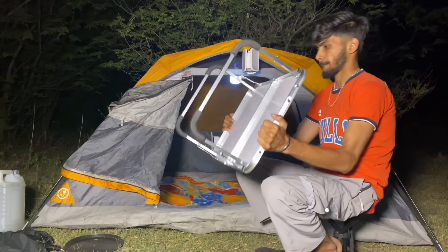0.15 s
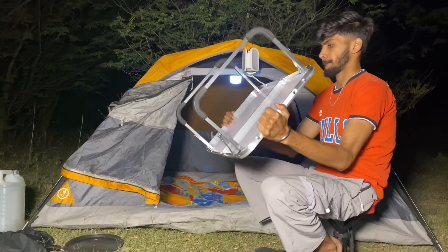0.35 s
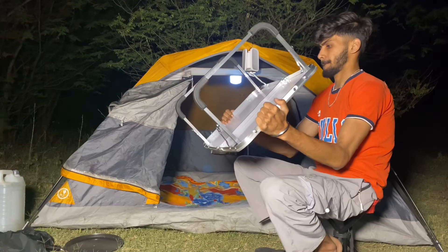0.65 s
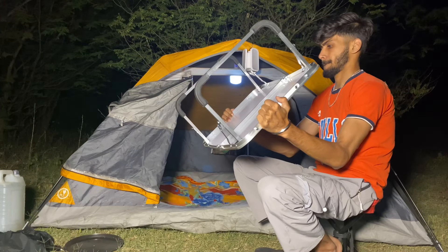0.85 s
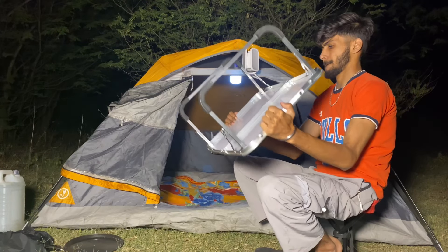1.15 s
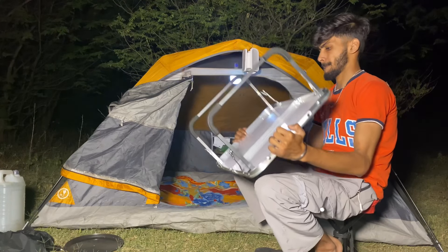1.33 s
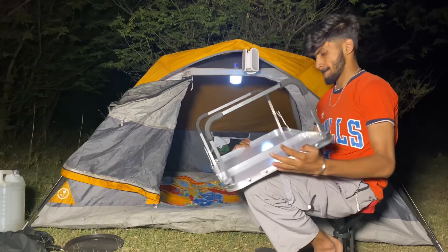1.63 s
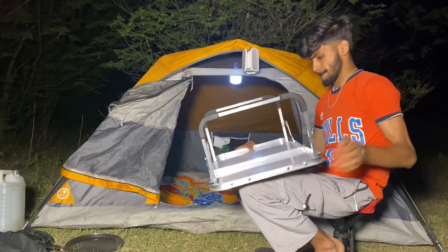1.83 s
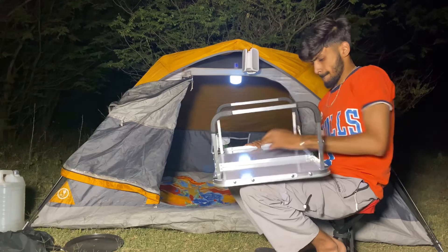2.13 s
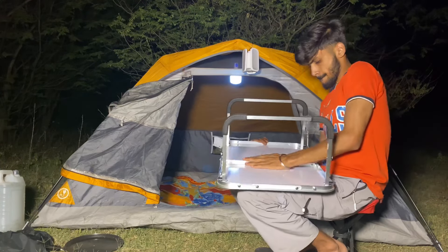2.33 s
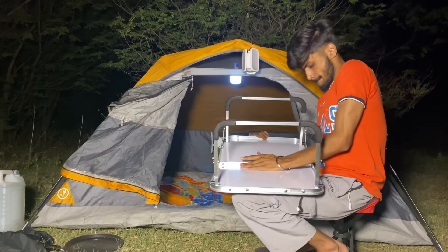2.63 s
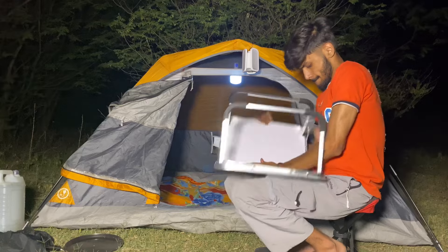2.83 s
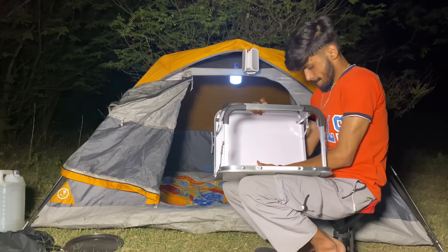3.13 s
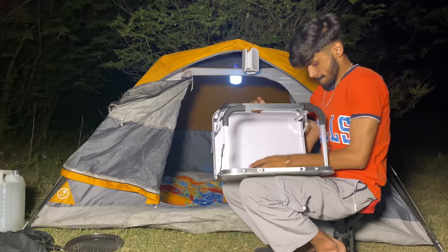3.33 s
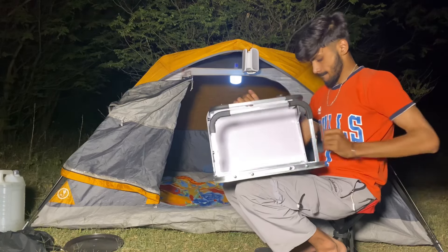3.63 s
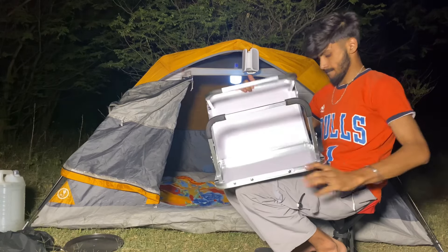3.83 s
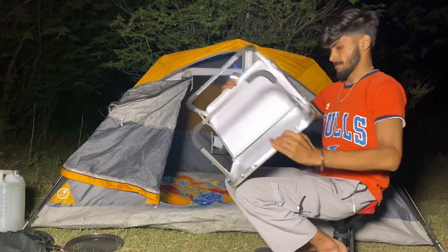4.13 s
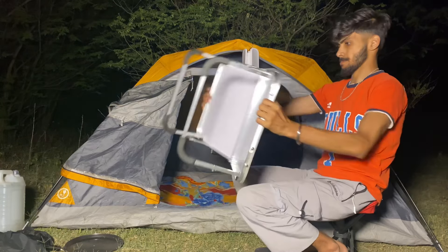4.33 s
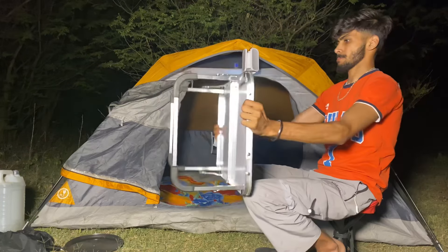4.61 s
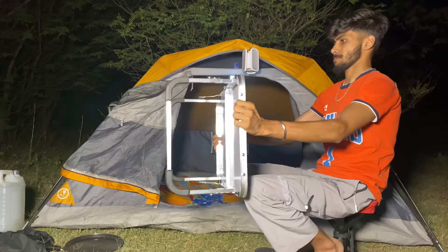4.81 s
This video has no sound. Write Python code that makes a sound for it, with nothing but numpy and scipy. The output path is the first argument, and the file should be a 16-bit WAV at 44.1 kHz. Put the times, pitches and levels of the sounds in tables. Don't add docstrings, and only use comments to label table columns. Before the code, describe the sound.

Close to a stereo microphone outdoors at night, a light folding aluminium table is turned and opened. Faint taps come first, then one loud brace snap with a quick bounce, a soft lap thump with palm rubbing, a quieter spell of faint dragging, and a second sharp snap that rattles into small clicks. Crickets trill steadily throughout over a far low rumble and soft hiss.

```python
import sys
import numpy as np
from scipy import signal
from scipy.fft import rfft, irfft, next_fast_len
from scipy.io import wavfile
from scipy.ndimage import uniform_filter1d, map_coordinates

SR = 44100
rng = np.random.default_rng(int(sys.argv[2]) if len(sys.argv) > 2 else 0)


def master(y):
    cut = np.clip(np.atleast_2d(y).T, -1, 1)
    pcm = np.round(cut * 32767)
    wavfile.write(sys.argv[1], SR, pcm.astype(np.int16))


def linear_from_db(decibels):
    return 10 ** (np.asarray(decibels, float) / 20)


N = 219085

# (start [s], end [s])
ON_LAP = (2.0, 3.37)


def evened(x):
    return x / np.sqrt(np.mean(x ** 2) + 1e-20)


def read(points, hz):
    f, value = np.transpose(points)
    return np.interp(np.log(hz + 1), np.log(f + 1), value)


def add(mix, s, sound):
    part = mix[round(s * SR):][:len(sound)]
    part += sound[:len(part)]


def resonate(x, hz, width):
    turn = np.exp(2j * np.pi * np.cumsum(hz * np.ones(len(x))) / SR)
    r = np.exp(-np.pi * width / SR)
    once = signal.lfilter([1 - r], [1, -r], x / turn + 1e-18)
    twice = signal.lfilter([1 - r], [1, -r], once)
    return 2 * (turn * twice).real


def drift(per_s):
    knots = rng.standard_normal(400)
    return evened(map_coordinates(knots, [np.arange(N) * per_s / SR], order=3, mode="wrap"))


def coloured(x, gain):
    size = next_fast_len(len(x) + 512)
    return irfft(rfft(x, size) * gain(np.fft.rfftfreq(size, 1 / SR)), size)[:len(x)]


def afar(x, pan_db, wet, t60=0.23, count=1):
    tail = rng.standard_normal((2, 9000)) * linear_from_db(-60 * np.arange(9000) / SR / t60)
    scatter = evened(signal.oaconvolve(x[None], tail, axes=1)[:, :N]) * np.std(x)
    direct = np.array([x, np.roll(x, count)])
    both = np.sqrt(1 - wet) * direct + np.sqrt(wet) * scatter
    return both * linear_from_db(np.array([[pan_db], [-pan_db]]) / 2)


def night_air():
    # (frequency [Hz], level [dB per Hz])
    centre_colour = [(25, -49.5), (45, -3), (65, 1.5), (110, -6), (200, -12.5), (400, -30.5), (800, -40),
                     (2000, -40.5), (3700, -36.5), (5900, -39.5), (9000, -38.5), (11000, -46), (12300, -10),
                     (13600, -40)]
    side_colour = [(25, -62), (65, -18), (150, -19.5), (400, -29), (1200, -34), (2000, -41), (3700, -74.5),
                   (5900, -41.5), (8800, -31.5), (10200, -39.5), (11800, -42.5), (13000, -25.5),
                   (14000, -40), (15500, -49.5)]
    # (frequency [Hz], half the lead [rad])
    rumble_lead = [(40, .1), (150, .1), (400, 0.029)]
    frames = N // 256 + 5
    a, b, c, d, patches = rng.standard_normal((frames, 513, 5)).T
    patches = uniform_filter1d(patches, size=10, axis=0)
    patches = evened(uniform_filter1d(patches, size=14, axis=1))
    z = np.array([a + 1j * b, c + 1j * d]) * linear_from_db(2.1 * patches)
    mid, side = signal.istft(z, nperseg=1024, noverlap=768)[1][:, :N]
    mid = coloured(mid, lambda f: linear_from_db(read(centre_colour, f)))
    side = coloured(side, lambda f: linear_from_db(read(side_colour, f)))
    side = side + coloured(mid, lambda f: 1j * read(rumble_lead, f))
    return linear_from_db(-44) * np.array([mid + side, mid - side]) * linear_from_db([[-.8], [.8]]) / np.std(mid)


def trill(hz, spread, glide, per_s, duty):
    strokes = np.cumsum(per_s * (1 + .012 * drift(3.0))) / SR + rng.random()
    place = strokes % 1 / duty
    stroke = np.sin(np.pi * np.minimum(place, 1)) ** 2
    pitch = hz + spread * drift(20.0) - glide * (place - .5)
    tone = np.sin(2 * np.pi * np.cumsum(pitch) / SR)
    return evened(stroke * linear_from_db(0.62 * drift(6.0)) * tone)


def phrases(rows, rise_s, fall_s):
    t = np.arange(N) / SR
    return sum(linear_from_db(db) * np.clip(np.minimum((t - s) / rise_s, (s + span - t) / fall_s), 0, 1) ** 2
               for s, span, db in rows)


def wide_buzz():
    beat_per_s = 24.0 + 0.37 * drift(3.1)
    beat = 1 + 0.2 * np.cos(2 * np.pi * np.cumsum(beat_per_s) / SR)
    buzz = sum(resonate(rng.standard_normal(N) * beat, 7700 * k, 520) for k in (.985, 1.025))
    return afar(linear_from_db(-63) * linear_from_db(2.0) * evened(buzz), 4.06, 0.33, t60=.01, count=-1)


def steady_crickets():
    # (pitch [Hz], pitch spread [Hz], glide [Hz], pulse rate [per s], sounding share [0-1],
    # level [dB], left-right balance [dB], foliage share [0-1])
    singers = [(2939, 25, 160, 46, .6, -50, 10.5, 0.48), (2952, 30, 180, 53.0, 0.5, -44, 3.5, 0.88),
               (2955, 30, 100, 74, 0.5, -47.5, -3.5, 0.96), (2840, 48, 150, 44.5, 0.4, -50, -8, 0.98),
               (2643.5, 23, 100, 51, 0.7, -57, 2.5, 0.38), (4400, 16, 680, 56, 1, -61, 0.5, 0.18),
               (4330, 46, 230, 35, 0.2, -67, 16, 0.52)]
    return sum(afar(linear_from_db(db) * trill(*voice), pan, wet, count=-2) for *voice, db, pan, wet in singers)


def pausing_crickets():
    # (start [s], length [s], level [dB])
    calls = [
        (-.1, 0.14, -56),
        (.3, 0.18, -59),
        (.74, .19, -60.5),
    ]
    long_trill = [
        (.6, 0.28, -70.5),
        (.93, 1.92, -61),
    ]
    fast_calls = [
        (-.2, 0.61, -60),
        (1.17, .63, -61.5),
        (3.0, 0.325, -58),
        (4.4, 0.34, -58.5),
    ]
    # (time [s], pulse rate [per s])
    wing_pace = [(0, 63.5), (.9, 64.5), (1.1, 59), (1.5, 62), (3.0, 62.5)]
    song = phrases(calls, 0.0793, .03) + phrases(long_trill, .15, .04)
    pace = np.interp(np.arange(N) / SR, *np.transpose(wing_pace))
    slow = afar(linear_from_db(1) * song * trill(5230, 30, 420, pace, .58), 5, .2)
    fast = phrases(fast_calls, 0.13, 0.016) * trill(6640, 45, 200, 130, .7)
    return slow + afar(fast, 4.5, .3)


def high_chirper():
    # (time [s], level [dB], length [s])
    chirps = [(0.31, -60, 0.064), (0.63, -58.5, 0.053), (1.0121, -62, 0.07), (1.336, -62, 0.092),
              (1.65, -57.5, 0.074), (1.998, -57.5, 0.031), (2.503, -68, 0.085), (2.918, -60, 0.11),
              (3.206, -60.5, 0.065), (3.493, -61, 0.038), (3.785, -60.5, 0.056), (4.136, -57, 0.07),
              (4.78, -60, 0.056)]
    t = np.arange(N) / SR
    bursts = sum(linear_from_db(db) * np.clip(np.minimum(t - s, s + span - t) / 0.0071, 0, 1)
                 for s, db, span in chirps)
    throb = 1 + 0.43 * np.cos(2 * np.pi * 70.0 * t)
    rasp = evened(resonate(rng.standard_normal(N) * throb, 9880, 420))
    return afar(linear_from_db(-6.5) * bursts * rasp, 0.3, 0.09, count=0)


def handling():
    # (start [s], length [s], level [dB], weight [dB], brightness [dB])
    strokes = [(0.0, 0.073, -67.5, 6.5, 3), (1.13, .1, -66, 1, -20), (1.38, 0.36, -75, -4, 6),
               (2.6, 0.22, -75, 5, 11.5), (2.8, .14, -44, 3.5, -17.5), (2.92, 0.11, -53.5, 4, -2.5),
               (2.98, 0.124, -56, -9.5, -8.5), (3.26, 0.05, -69, 13.5, -13), (3.29, 0.068, -63, -12, -6),
               (3.39, .24, -68.5, 10, -23), (3.58, .75, -74.5, 11.5, -30), (3.88, .04, -65, -10, -21.5),
               (4.29, 0.21, -55, -10, -8.5), (4.52, 0.15, -56, -3.5, -8)]
    settling = [
        (1.545, 0.19, -57.5, 7, -25.5),
        (2.3, 0.071, -38.5, 5, -22),
        (2.39, 0.15, -49, 3.5, -25.5),
        (3.93, 0.15, -67, -4, 1.5),
        (4.47, 0.092, -48.5, 10, -4.5),
    ]
    out = np.zeros((N, 4))
    for rows, settles in ((strokes, False), (settling, True)):
        for s, span, db, weight_db, bright_db in rows:
            u = np.arange(0, 1, 1 / (span * SR))
            edge = np.minimum(u, 1 - u)
            if settles:
                shape = np.minimum(edge * span / 0.0063, 1) * linear_from_db(-17.5 * u)
            else:
                shape = np.minimum(edge / 0.23, 1) ** 2
            gains = linear_from_db(db + np.array([0, weight_db, bright_db, bright_db - 3.5]))
            add(out, max(s, 0), shape[:, None] * gains)
    return out.T


def drag_gain(spans):
    t, out = np.arange(N) / SR, np.zeros(N)
    for rows in spans:
        rows = np.array(rows)
        edge = np.minimum(t - rows[0, 0] + 0.0077, rows[-1, 0] - t + 0.019) / 0.013
        out += np.clip(edge, 0, 1) * linear_from_db(np.interp(t, rows[:, 0], rows[:, 1]))
    return out


def rubbing():
    # (time [s], level [dB], pitch [Hz])
    palm = [
        (2.91, -56, 1163),
        (2.96, -52, 1137),
        (3.04, -53, 1057),
        (3.085, -66.5, 1083),
    ]
    rim = [
        (3.42, -70, 950),
        (3.6, -74, 1150),
        (3.72, -68, 1330),
        (3.88, -62, 1350),
        (3.98, -68, 1350),
        (4.07, -62, 1340),
        (4.14, -66, 1350),
        (4.22, -59, 1340),
        (4.39, -61, 1420),
    ]
    t = np.arange(N) / SR
    grains = rng.standard_normal(N) * linear_from_db(4.0 * drift(75.0))
    low_hz = np.where((t > ON_LAP[0]) & (t < ON_LAP[1]), 490, 320)
    # (centre [Hz], width [Hz], level [dB])
    bands = [(1300, 2000, 1.3), (low_hz, 330, 1.0), (4170, 5100, 9.7), (9000, 3000, 2.6)]
    out = sum(linear_from_db(db) * gain * evened(resonate(grains, hz, width))
              for gain, (hz, width, db) in zip(handling(), bands))
    drag_hz = np.interp(t, *np.array(palm + rim)[:, [0, 2]].T)
    hollow = evened(resonate(rng.standard_normal(N), drag_hz, 400) * linear_from_db(2.5 * drift(14.0)))
    return out + drag_gain([palm, rim]) * hollow


def ring(modes, t, detune):
    return sum(linear_from_db(db - 60 * t / t60) * np.sin(2 * np.pi * hz * rng.uniform(1 - detune, 1 + detune) * t)
               for hz, db, t60 in modes)


def blow(db, thud_db, ring_db, tick_db, thud_hz, dip_db=0):
    # (frequency [Hz], level [dB], time to fall 60 dB [s])
    upper_modes = [(815, 0, .06), (1130, 3, .055), (1330, 1, .06), (1670, -3, .05), (1940, -5, .05),
                   (2140, -4, .03), (2290, -8, .06), (3030, -4, .04), (3400, -3, .03), (3760, 1, .045),
                   (4520, 2, .04)]
    low_modes = [(255.6, -5.5, 0.02), (370, -2.5, 0.057), (437, 2.5, 0.022), (575, 0.5, 0.141)]
    corners_hz = [700, 1000, 2000, 4500, 9700, 12500]
    t = np.arange(4400) / SR
    contacts = rng.standard_normal(len(t)) * linear_from_db(3.0 * rng.standard_normal(len(t))) * np.exp(-t / .0009)
    contacts /= np.linalg.norm(contacts)
    shimmer = linear_from_db(8) * rng.standard_normal(len(t)) * linear_from_db(-60 * t / .034) * np.minimum(t / .001, 1)
    modes = linear_from_db(-3) * ring(upper_modes, t, .01 - .006 * dip_db) * (.35 + np.exp(-t / .004))
    body = signal.fftconvolve(contacts, modes)[:len(t)] + shimmer + linear_from_db(9.0) * contacts
    corners_db = [db - 5.5 + dip_db / 4, db + 2.5 + dip_db, db - 1.0,
                  ring_db + 4.5, tick_db + 2.0, tick_db - 13.0]
    size = 4096
    colour = np.transpose([corners_hz, corners_db])
    gain = read(colour, np.fft.rfftfreq(size, 1 / SR)) * np.log(10) / 20
    mirrored = np.r_[gain, gain[-2:0:-1]]
    causal = np.fft.ifft(np.exp(np.conj(signal.hilbert(mirrored)))).real[:size // 2]
    crack = linear_from_db(-6.5) * signal.fftconvolve(body, causal)[:len(t)]
    swing = ring(low_modes, (t - .005) * thud_hz / 470, .02)
    held = np.exp(-(t / .0075) ** 4) + .16
    return crack + linear_from_db(thud_db - 13.5) * swing * (1 - np.exp(-(t / 0.0013) ** 2)) * held


def snaps_and_taps(x):
    # (time [s], peak [dB], panel thud [dB], ring [dB], tick [dB])
    snaps = [
        (2.276, -5.5, -2, -10.5, -17),
        (2.2885, -15.5, -17.5, -37, -64),
        (2.3722, -17.5, -12, -29, -42),
        (4.4201, -25, -23, -20.5, -13),
        (4.423, -8, -32.5, -20.5, -9.5),
        (4.4311, -18.5, -23, -44.5, -26),
        (4.4372, -24, -30.5, -24.5, -21),
        (4.4455, -19.5, -21, -27, -43),
        (4.4531, -14, -17.5, -26.5, -24),
        (4.4614, -19.5, -36.5, -33.5, -50),
    ]
    # (time [s], peak [dB], weight [dB], hardness [dB])
    taps = [(0.28, -52, -15, 13.5), (1.5258, -45, -25, -22), (1.5456, -47, 14, -40),
            (1.5853, -46.5, 5, -39), (1.7923, -47.5, -22, -19), (2.322, -32, 4, -33),
            (2.4912, -53, -12, -30), (2.7964, -55, 14, 7.5), (2.8168, -46, -8, 3), (2.835, -43, 7, 8),
            (2.8669, -35.5, 10, -10), (2.8795, -41.5, 10.5, -34), (2.9065, -54, 1.5, -20),
            (3.0021, -36.5, -23, -18), (3.271, -57.5, 24.5, -23), (3.9348, -56.5, 13, -2),
            (4.3235, -39.5, -31.5, -28), (4.3438, -47.5, -21, 4.5), (4.4033, -31, -21, -10.5),
            (4.4997, -27, -33.5, -24), (4.5294, -41.5, -15, -3), (4.5658, -45, 8.5, -7),
            (4.579, -37, -10.5, -18), (4.6038, -43.5, -16, 1.5), (4.624, -33.5, -33, -11),
            (4.7393, -51.5, -10, 5)]
    held_hz = 319
    for s, *row in snaps:
        add(x, s, blow(*row, 489) if s < ON_LAP[1] else blow(*row, held_hz, -8))
    for s, db, weight_db, hard_db in taps:
        thud_hz = 530 if ON_LAP[0] < s < ON_LAP[1] else held_hz
        ring_db = db - 5.5 + .4 * hard_db
        thin_db = 0.46 * min(weight_db, 0)
        add(x, s, blow(db, db + weight_db, ring_db, db + hard_db, thud_hz, thin_db))


def thumps_and_ping(x):
    thumps = [
        (2.286, -29.5, 123.3, 0.12),
        (2.867, -19, 123.7, 0.078),
        (4.428, -19.5, 80.2, 0.12),
    ]
    pin = (2.277, -40, 14100, .11)
    t = np.arange(9000) / SR
    for s, db, hz, t60 in thumps + [pin]:
        add(x, s, linear_from_db(db - 60 * t / t60) * np.minimum(t * hz, 1) * np.sin(2 * np.pi * hz * t))


def ports(x, balance):
    # (frequency [Hz], phase [rad])
    port_lag = [(130, -.2), (300, .15), (1500, -.1), (3000, -.9), (4500, -.9), (6000, -.3), (8500, -2.0),
                (9800, -.3)]
    half = lambda f: linear_from_db(read(balance, f) / 2) * np.exp(-.5j * read(port_lag, f))
    return np.array([coloured(x, half), coloured(x, lambda f: 1 / half(f))])


def folding_table():
    # (frequency [Hz], left-right balance [dB])
    flat_balance = [(60, -1.5), (130, -2.0), (290, -3.0), (640, -6.5), (1410, -2.0), (3100, 1.5),
                    (6820, 1.5), (15000, 0.0)]
    edge_balance = [(60, 1.5), (240, 0.0), (950, 1.0), (3770, 2.0), (15000, 1.0)]
    x = rubbing()
    snaps_and_taps(x)
    thumps_and_ping(x)
    turned = np.clip(np.arange(N) / SR - 3.7, 0, .5) * 2
    near = ports(x * (1 - turned), flat_balance) + ports(x * turned, edge_balance)
    return near + linear_from_db(-14) * afar(x, 0, 1, t60=.07)


def scene():
    insects = wide_buzz() + steady_crickets() + pausing_crickets() + high_chirper()
    return night_air() + insects + folding_table()


def emptied(x):
    # (low edge [Hz], high edge [Hz], silent share in the centre [0-1], silent share at the sides [0-1])
    weak_bands = [(1400, 1750, .1, .05), (1950, 2300, .14, .2), (3500, 3900, .5, .4), (4700, 5050, .3, .3),
                  (5050, 5600, .16, .2), (6350, 6850, .3, .3), (9250, 9600, .1, .3),
                  (10200, 10700, .12, .8), (10700, 11200, .2, .3), (11200, 11700, .55, .1),
                  (11700, 12600, .96, .1), (12600, 13000, .55, .2), (15100, 15500, .55, .1),
                  (15500, 16000, .95, .1)]
    hz, _, z = signal.stft(x, SR, nperseg=2048, noverlap=1536)
    keep = np.ones(z.shape)
    for low_hz, high_hz, *shares in weak_bands:
        band = (hz >= low_hz) & (hz < high_hz)
        power = uniform_filter1d((abs(z[:, band]) ** 2).mean(1), size=3)
        for k, share in enumerate(shares):
            keep[k, band] = power[k] > np.quantile(power[k], share)
    return signal.istft(z * keep, SR, nperseg=2048, noverlap=1536)[1][:, :N]


def low_pass(x):
    return signal.sosfilt(signal.butter(12, 15950, fs=SR, output="sos"), x)


def record(dry):
    notch = [(9000, -0.5), (11000, 1.0), (12300, -27.5), (13500, 1), (15500, -6.5)]
    side_gaps = [(8800, 0), (9500, 1.5), (10600, -41), (11200, -1), (13100, -10.5), (13600, -19.5),
                 (14600, -23), (15200, 2)]
    mid = coloured(dry.mean(0), lambda f: linear_from_db(read(notch, f)))
    side = coloured((dry[0] - dry[1]) / 2, lambda f: linear_from_db(read(side_gaps, f)))
    mid, side = emptied(np.array([mid, side]))
    mix = np.clip([mid + side, mid - side], -1, 1)
    return low_pass(mix)


dry = scene()
out = record(dry)
master(out)
```